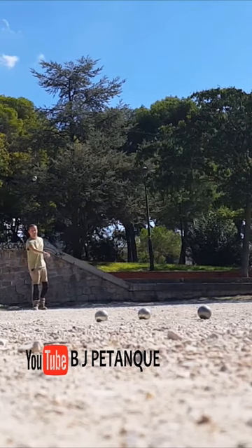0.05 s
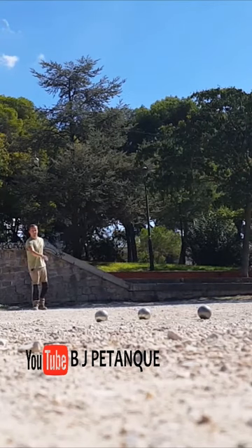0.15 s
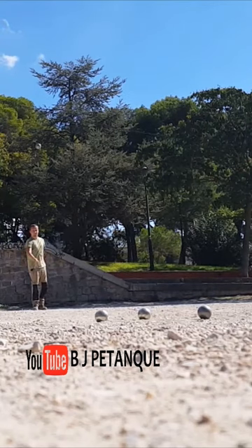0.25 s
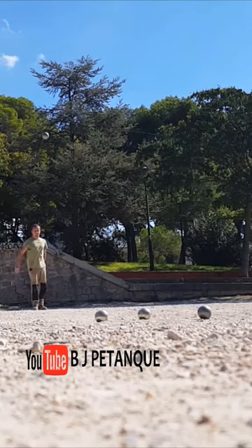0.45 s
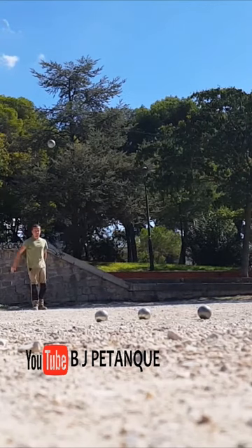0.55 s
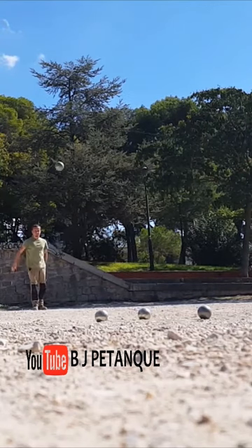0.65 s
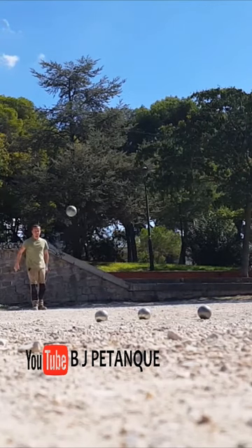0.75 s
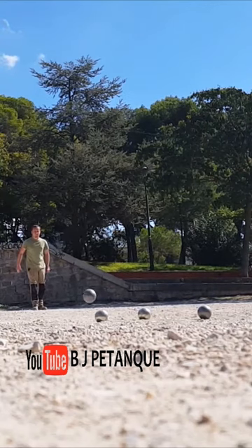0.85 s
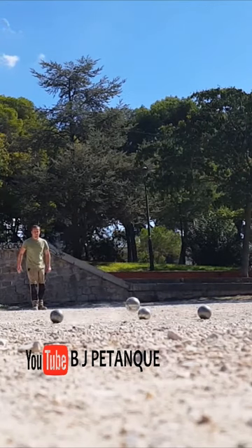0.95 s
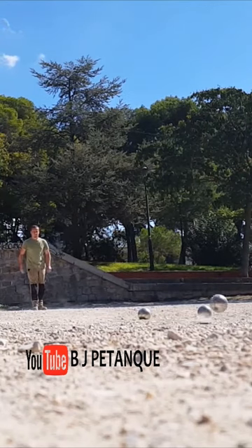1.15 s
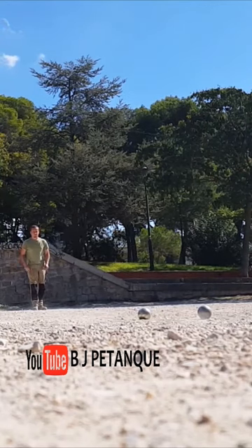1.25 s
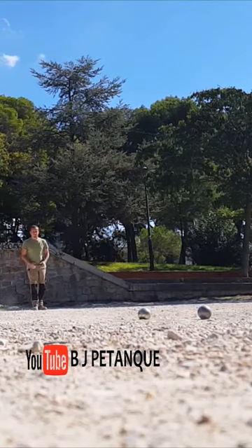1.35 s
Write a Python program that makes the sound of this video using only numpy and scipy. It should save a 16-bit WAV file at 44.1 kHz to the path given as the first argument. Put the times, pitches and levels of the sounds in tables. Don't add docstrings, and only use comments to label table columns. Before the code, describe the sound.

Loud metal ball strike with brief high ringing and scattering grit, preceded by low wind rumble

```python
import sys
import numpy as np
from scipy import signal
from scipy.fft import rfft, irfft, next_fast_len
from scipy.io import wavfile
from scipy.ndimage import uniform_filter1d, map_coordinates

SR = 44100
rng = np.random.default_rng(int(sys.argv[2]) if len(sys.argv) > 2 else 0)


def elevation(decibels):
    levels = np.asarray(decibels, float)
    return 10 ** (levels / 20)


def to_wav(sig):
    pcm = np.clip(np.atleast_2d(sig), -1, 1) * 32767
    pcm = np.round(pcm).astype(np.int16)
    wavfile.write(sys.argv[1], SR, pcm.T)


N = 61739
TIME = np.arange(N) / SR


def unit(x):
    return x / np.sqrt(np.mean(x ** 2, axis=-1, keepdims=True) + 1e-20)


def along(points, hz):
    f, value = np.transpose(points)
    return np.interp(np.log(hz + 1), np.log(f + 1), value)


def curves(rows):
    s, *columns = np.transpose(rows)
    return [np.interp(TIME, s, column) for column in columns]


def wobble(rate):
    return map_coordinates(rng.standard_normal(2000), [np.arange(N) * rate / SR])


def filtered(x, response):
    m = next_fast_len(N + SR // 2)
    return irfft(rfft(x, m) * response(np.fft.rfftfreq(m, 1 / SR)), m)[..., :N]


def peak(f, hz, width_hz):
    return 1j * f * width_hz / (hz * hz - f * f + 1j * f * width_hz)


def dull(x, hz):
    return signal.sosfilt(signal.butter(6, hz, fs=SR, output="sos"), x)


def pan(db):
    return elevation(np.array([[db / 2], [-db / 2]]))


def echo(x, t60s):
    hz, t, z = signal.stft(rng.standard_normal((2, SR // 2)), SR, nperseg=256)
    fading = z * elevation(-60 * t / along(t60s, hz)[:, None])
    tail = signal.istft(fading, SR, nperseg=256)[1]
    return signal.fftconvolve(x[None], tail / np.linalg.norm(tail[0]), axes=1)[:, :N]


def grains(s, db, hz, cycles, size=400):
    turns = hz[:, None] * np.arange(size) / SR
    fade = elevation(db[:, None] - 20 * turns / cycles)
    soft_start = 1 - np.exp(-turns / 0.32)
    waves = fade * np.sin(2 * np.pi * turns) * soft_start
    at = np.round(s * SR).astype(int)[:, None] + np.arange(size)
    return np.bincount(at.ravel(), waves.ravel(), N + SR)[:N]


HIT_S, CONTACT_S, TICK_SAMPLES = 1.05908, .00018, 3
# f/Hz, width/Hz, level/dB
AIR_SPRING = [(1562, 1566, 3.9), (1998, 2254, 14)]
HOLLOW = [(3810, 1430, -11.4), (1000, 500, -2.2)]
GROUND = [(318, 306, -7.9), (507, 1760, -7.1)]
BRIGHT_EDGE = [(14000, 2700, -25.5), (9600, 7500, -2.5)]
OTHER_BALL = [(1295, 825, -7.7), (2380, 840, -1.7)]
GROUND_LATE = [.001165, .0011]
OTHER_BALL_LATE = [.0004, .00109]


def crack():
    t = TIME - HIT_S
    push = np.sin(np.pi * np.clip(t / CONTACT_S, 0, 1))
    tick = np.sin(np.pi * np.clip(t * SR / TICK_SAMPLES, 0, 1))

    def once(f, hz, width_hz, db):
        return 2 * elevation(db) * peak(f, hz, width_hz)

    def twice(f, hz, width_hz, db):
        return once(f, hz, width_hz, db) * peak(f, hz, width_hz)

    def late(f, s):
        return np.exp(-2j * np.pi * f * s)

    ports = []
    for side in range(2):
        def body(f):
            direct = twice(f, *AIR_SPRING[side]) + twice(f, *HOLLOW[side])
            ground = -2 * late(f, GROUND_LATE[side]) * once(f, *GROUND[side])
            other = late(f, OTHER_BALL_LATE[side]) * twice(f, *OTHER_BALL[side])
            return direct + ground + other

        edge = filtered(tick, lambda f: twice(f, *BRIGHT_EDGE[side]))
        ports.append(filtered(push, body) + edge)
    return np.array(ports)


# f/Hz, level/dB, time to fall 60 dB t60/s
STEEL = [(9071, -72, .3), (10130, -66, .4), (10400, -66, .3), (10610, -70, .4), (12790, -58, .5),
         (12880, -62, .5), (14030, -53, .6), (14080, -60, .7), (14290, -56, .4), (14510, -56, .5),
         (14650, -59, .6), (14850, -64, .4), (15210, -60, .6)]
RING_DB, RING_PAN_DB = -4, -4
SPIN_HZ, RING_FLUTTER_DB = 22, 4


def ring():
    t = np.maximum(TIME - HIT_S, 0)
    ports = np.zeros((2, N))
    for port in ports:
        for hz, db, t60 in STEEL:
            level = elevation(db + RING_DB - 60 * t / t60 + RING_FLUTTER_DB * wobble(45))
            turns = np.cumsum(hz + SPIN_HZ * wobble(53)) / SR
            port += level * np.sin(2 * np.pi * turns)
    return pan(RING_PAN_DB) * ports * (TIME > HIT_S)


THUD_S, THUD_DB, THUD_HZ, THUD_WIDTH_HZ = 1.0732, -7, 326, 320


def thud():
    push = -np.sin(np.pi * np.clip((TIME - THUD_S) / 0.0014, 0, 1))
    low = filtered(push, lambda f: THUD_HZ / THUD_WIDTH_HZ * peak(f, THUD_HZ, THUD_WIDTH_HZ))
    return pan(-1.6) * elevation(THUD_DB) * low


# t/s, level/dB, f/Hz, left-right level/dB
KNOCKS = [(1.0735, -14, 1700, -10), (1.0632, -24, 1500, -8), (1.0665, -22, 1500, -6),
          (1.0695, -25, 1400, -6), (1.081, -27, 1300, -7), (1.082, -24, 380, -3), (1.088, -29, 1300, -8),
          (1.089, -27, 350, -5), (1.0935, -22, 1100, -7), (1.096, -28, 330, -5), (1.1, -21, 1900, -7),
          (1.109, -23, 1900, -6), (1.113, -30, 1800, -10), (1.118, -31, 800, 0), (1.1368, -18, 2000, -2),
          (1.137, -22, 900, -2), (1.1398, -21, 1500, 0), (1.156, -32, 700, -4), (1.164, -33, 1000, -4),
          (1.18, -35, 1200, -8), (1.188, -28, 1500, -5), (1.199, -34, 1200, -5), (1.271, -39, 1500, -8),
          (1.2805, -30, 1150, -14), (1.282, -28, 800, -14), (.446, -30, 750, -8), (.625, -34, 800, -8),
          (.744, -32, 750, -8)]


def knocks():
    out = np.zeros((2, N))
    for s, db, hz, pan_db in KNOCKS:
        r = rng.standard_normal((6, 3))
        times = s + .0004 * np.abs(r[:, 0])
        levels = db - 7 + 1.5 * r[:, 1]
        pitches = hz * np.geomspace(.55, 2.1, 6) * np.exp(0.1 * r[:, 2])
        clump = grains(times, levels, pitches, cycles=1.8)
        out += pan(pan_db) * dull(clump, 2.8 * hz)
    return out


SPRAY_DB, SPRAY_T60_S, SPRAY_HZ, SPRAY_CYCLES = -34, 0.1, 1620, 6.7
ROLL_DB = -52.5


def spray():
    out = np.zeros((2, N))
    for side in range(2):
        r, n = rng.random((500, 2)), rng.standard_normal(500)
        late = .002 + .335 * r[:, 0] ** 1.6
        fading_db = np.maximum(SPRAY_DB - 60 * late / SPRAY_T60_S, ROLL_DB)
        size_db = fading_db - 7.7 * np.log(1 - r[:, 1])
        pitches = SPRAY_HZ * np.exp(0.71 * n)
        grit = grains(HIT_S + late, size_db - 20.5, pitches, cycles=SPRAY_CYCLES)
        out += pan(-9 + 11 * side) * grit
    return out


# f/Hz, time to fall 60 dB t60/s
YARD = [(200, .2), (450, 0.18), (1000, 0.35), (2000, .5), (3500, 0.19), (8000, 0.074)]
YARD_DB, YARD_S = -31.5, .004
DULL_HZ = 4400


def yard(near):
    later = np.roll(near.mean(0), round(YARD_S * SR))
    return elevation(YARD_DB) * dull(echo(later, YARD), DULL_HZ)


# t/s, level/dB
GUSTS = [(0.0, -37.5), (0.228, -34.5), (0.248, -29), (0.424, -42.5), (0.45, -33), (0.568, -33),
         (0.598, -26), (0.63, -41.5), (0.658, -30.5), (0.732, -38), (0.844, -35), (0.942, -23),
         (0.968, -29), (1.086, -41), (1.112, -54), (1.214, -57), (1.4, -51.5)]
# f/Hz, level/dB
RUMBLE = [(15, -35.5), (25, -24.5), (70, 5), (117, -4), (151, -5), (487, -30), (565, -31.5), (900, -40),
          (1170, -54), (1980, -120)]
LEE_DB, LEE_SWING, LUMPS_DB = -43.5, 0.16, 3.5


def wind():
    db = curves(GUSTS)[0]
    noise = unit(filtered(rng.standard_normal((2, N)), lambda f: elevation(along(RUMBLE, f))))
    lumps = np.array([0.27 * wobble(33), wobble(35.54)])
    noise = unit(noise * elevation(LUMPS_DB * lumps))
    left_db = LEE_DB + LEE_SWING * (db - db.mean())
    return noise * elevation([left_db, db + 5])


# t/s, level/dB, f/Hz, push 1 or pull -1
PUFFS = [(.057, -25, 119, 1), (.205, -23.5, 137, -1), (.248, -19.5, 141, 1), (0.285, -22.5, 150, -1),
         (0.299, -17, 91.8, 1), (.365, -21, 114, -1), (.447, -16.5, 134, -1), (.47, -30, 109, -1),
         (.491, -13.5, 121, 1), (0.528, -18.5, 102, -1), (0.542, -22.5, 119, -1), (.575, -20.5, 295, -1),
         (0.581, -18, 124, -1), (0.593, -15.5, 115, -1), (0.655, -18.5, 84, -1), (0.697, -20, 160, -1),
         (0.885, -20, 157, -1), (0.903, -19, 264, 1), (0.928, -10, 102.2, -1), (.936, -11.5, 150, -1),
         (.942, -12, 154, -1), (.96, -15.5, 148.7, 1), (0.986, -29, 98.7, -1), (1.018, -21, 90, 1)]
PUFF_DB, PUFF_CYCLES = 10.5, 1.19


def puffs():
    s, db, hz, way = np.transpose(PUFFS)
    out = np.zeros(N)
    for w in (1, -1):
        on = way == w
        out += w * grains(s[on], db[on] + PUFF_DB, hz[on], cycles=PUFF_CYCLES, size=3000)
    return elevation([[-22], [0]]) * dull(out, 910)


# t/s, f/Hz, level/dB
BIRDS = [
    [(.355, 2850, -72), (.383, 3050, -61), (.4, 3300, -71), (.428, 3740, -63), (.47, 3720, -67),
     (.51, 3660, -71), (.58, 3600, -71), (.66, 3550, -78)],
    [(.42, 3350, -71), (.5, 3400, -71), (.58, 3400, -73), (.67, 3300, -77)],
    [(.662, 2550, -67), (.676, 2850, -62), (.686, 3000, -69)],
    [(.69, 3940, -68), (.7, 3950, -62), (.725, 3950, -70), (.84, 3940, -77)],
    [(.716, 4150, -62), (.73, 4170, -59), (.748, 4350, -58), (.795, 4150, -60), (.81, 4150, -72),
     (.845, 4130, -65), (.875, 4230, -61), (.895, 4200, -74), (1.03, 4150, -82)],
    [(.68, 4600, -70), (.692, 3700, -67)],
    [(.81, 4650, -78), (.84, 4700, -73)],
    [(.93, 4680, -74), (.965, 4600, -73)],
    [(1.13, 4200, -80), (1.2, 5300, -83), (1.26, 5700, -86)],
]
WARBLES = [85, 170, 20, 30, 60, 120, 60, 35, 140]
WARBLE_RATE, BIRD_PAN_DB = 300, -19
BIRD_ECHO_DB, BIRD_T60_S = -3, .2


def birds():
    out = np.zeros(N)
    for call, warble_hz in zip(BIRDS, WARBLES):
        hz, db = curves(call)
        start, end = call[0][0], call[-1][0]
        on = np.interp(TIME, [start - .01, start, end, end + .01], [0, 1, 1, 0])
        level = on * elevation(db + 1.1 * wobble(70))
        turns = np.cumsum(hz + warble_hz * wobble(WARBLE_RATE)) / SR
        out += level * np.sin(2 * np.pi * turns)
    return pan(BIRD_PAN_DB) * (out + elevation(BIRD_ECHO_DB) * echo(out, [(3000, BIRD_T60_S)]))


# start t/s, end t/s, f/Hz, width/Hz, level/dB, beats a second
INSECTS = [
    (-.05, 0.26, 12640, 278, -77, 35),
    (.05, 0.44, 8270, 150, -88.5, 23),
]
INSECT_PAN_DB, FADE_S, INSECT_FLUTTER_DB = -22.5, 0.081, 2


def insects():
    out = np.zeros(N)
    for start, end, hz, width_hz, db, beats in INSECTS:
        hiss = unit(filtered(rng.standard_normal(N), lambda f: peak(f, hz, width_hz) ** 2))
        fade = np.clip(np.minimum(TIME - start, end - TIME) / FADE_S, 0, 1)
        out += hiss * elevation(db + INSECT_FLUTTER_DB * wobble(beats)) * fade
    return pan(INSECT_PAN_DB) * out


# f/Hz, level/dB
AIR = [(150, -1.5), (330, -11.5), (700, -14), (1500, -23), (2500, -35), (5000, -44), (9600, -52.5),
       (13500, -52)]
# f/Hz, likeness from 0 to 1
ALIKE = [(200, 0.36), (1000, 0.26), (4000, .3), (12000, 0.054)]
AIR_DB, AIR_PAN_DB, AIR_TOP_HZ = -47, -5, 15400


def air():
    z = signal.stft(rng.standard_normal((2, N)), nperseg=512)[2]
    field = uniform_filter1d(rng.standard_normal(z.shape[1:]), size=6, axis=0)
    field = uniform_filter1d(field, size=10, axis=1)
    pair = signal.istft(z * elevation(0.4 * field / field.std()), nperseg=512)[1][:, :N]

    def colour(f):
        turn = np.arccos(np.clip(along(ALIKE, f), -1, 1)) / 2
        hush = elevation(along(AIR, f)) * (f > 140) * (f < AIR_TOP_HZ)
        return hush * np.array([np.cos(turn), np.sin(turn)])

    mid, side = filtered(pair, colour)
    return elevation(AIR_DB) * pan(AIR_PAN_DB) * unit(np.array([mid + side, mid - side]))


def scene():
    balls = crack() + ring()
    gravel = thud() + knocks() + spray()
    near = balls + dull(gravel, DULL_HZ)
    return near + yard(near) + wind() + puffs() + air() + birds() + insects()


def roll_off(x):
    return signal.sosfilt(signal.butter(12, 16860, fs=SR, output="sos"), x)


# t/s, level/dB
GAIN = [
    (0, -1.5),
    (1.062, -1.5),
    (1.11, -5.5),
    (1.2, -9),
    (1.4, -18.5),
]
TOP, KNEE, TOP_HZ = 0.99, 8, 16300


def record(dry):
    x = dry * elevation(curves(GAIN)[0])
    x = x / (1 + np.abs(x / TOP) ** KNEE) ** (1 / KNEE)
    mix = filtered(x, lambda f: 1 / (1 + (f / TOP_HZ) ** 60))
    return roll_off(mix)


dry = scene()
out = record(dry)
to_wav(out)
```